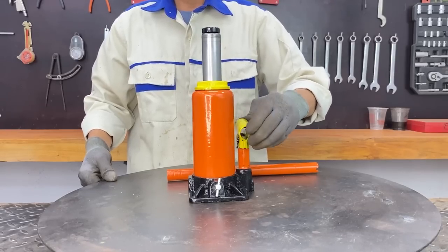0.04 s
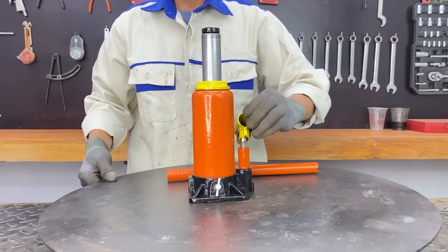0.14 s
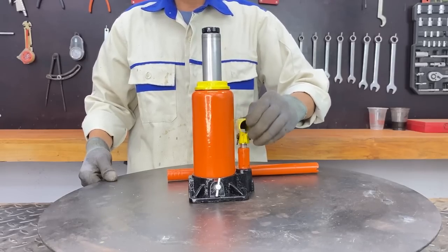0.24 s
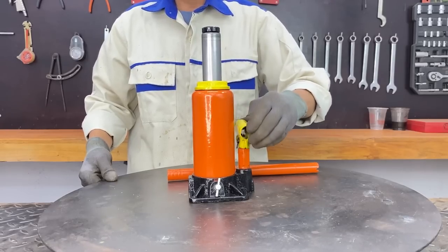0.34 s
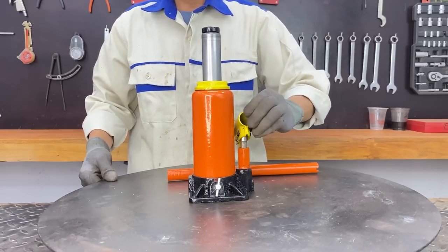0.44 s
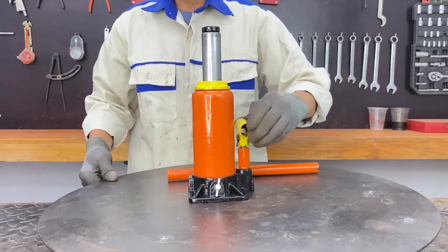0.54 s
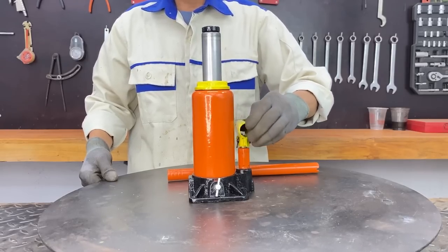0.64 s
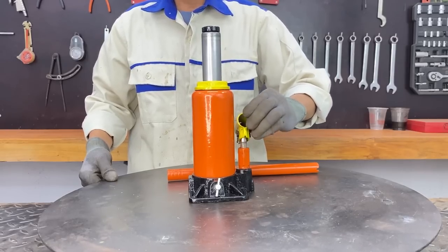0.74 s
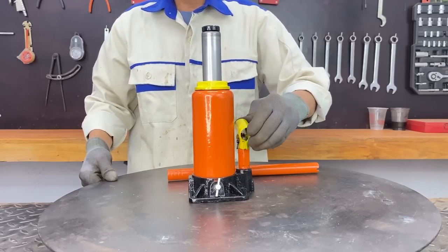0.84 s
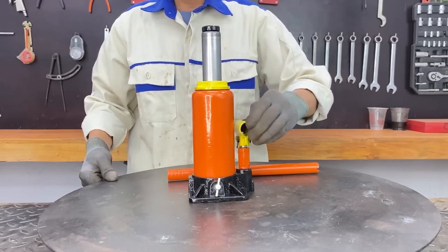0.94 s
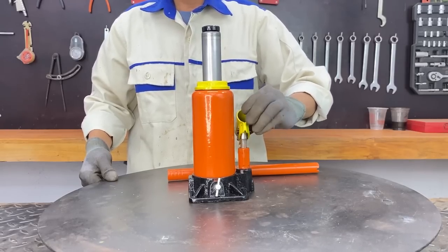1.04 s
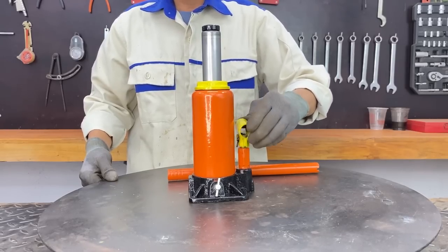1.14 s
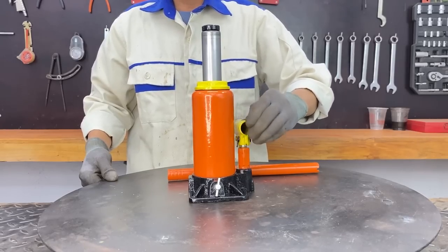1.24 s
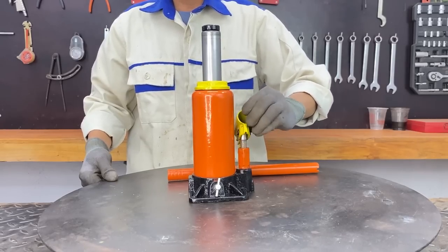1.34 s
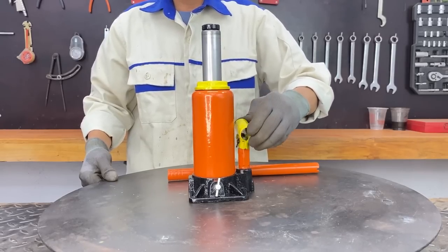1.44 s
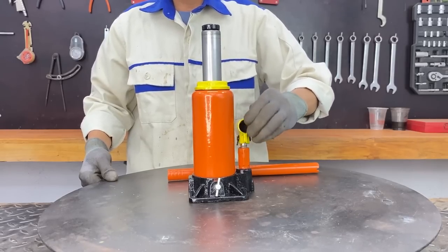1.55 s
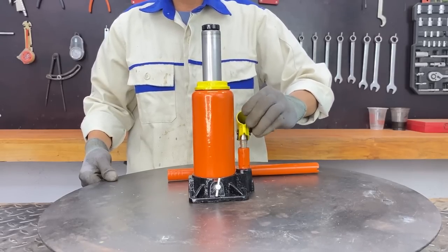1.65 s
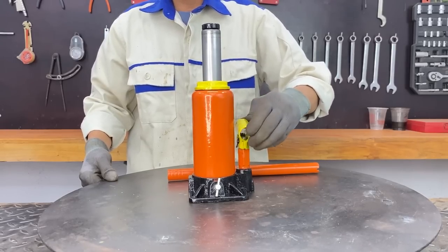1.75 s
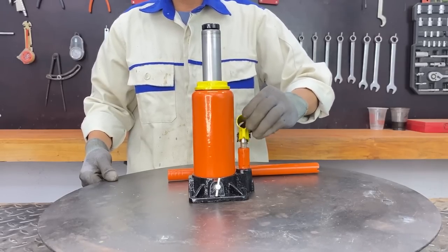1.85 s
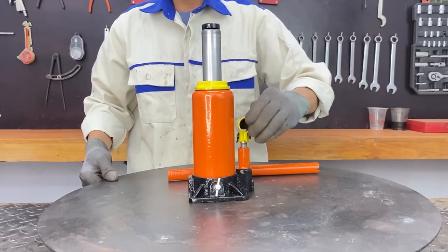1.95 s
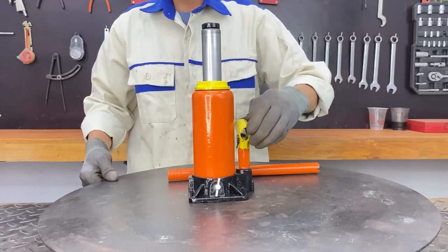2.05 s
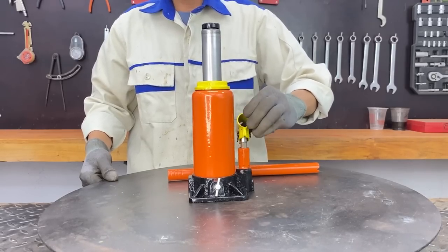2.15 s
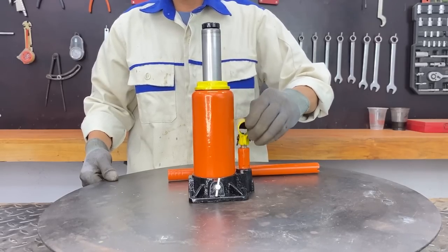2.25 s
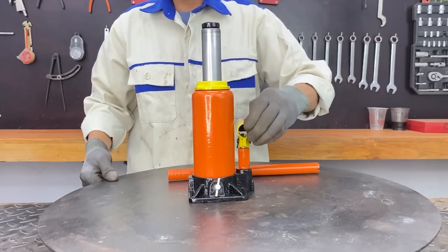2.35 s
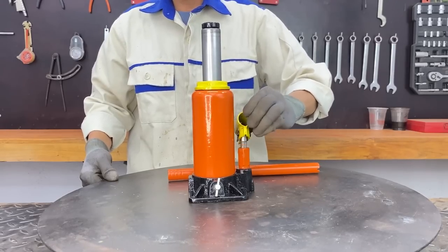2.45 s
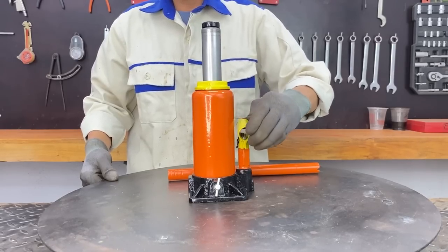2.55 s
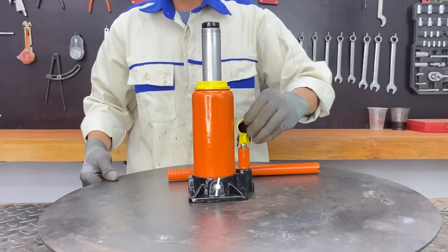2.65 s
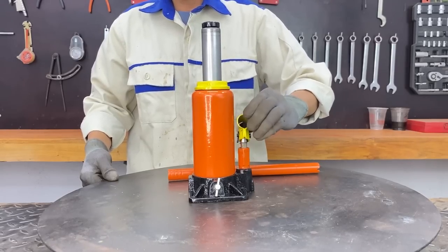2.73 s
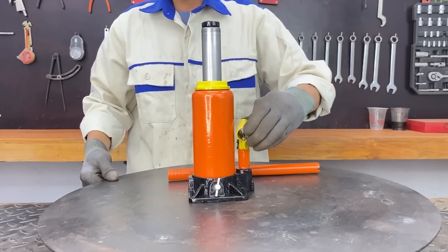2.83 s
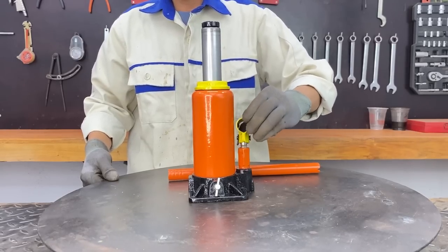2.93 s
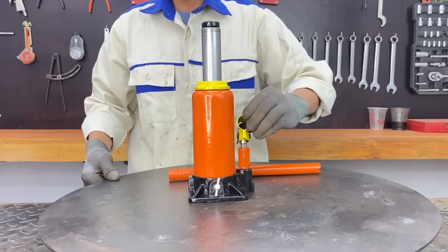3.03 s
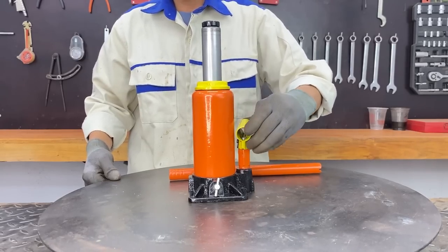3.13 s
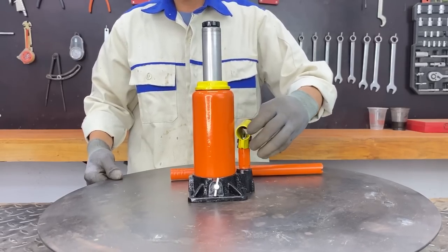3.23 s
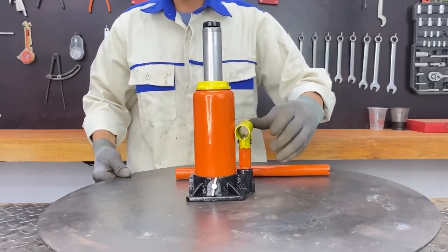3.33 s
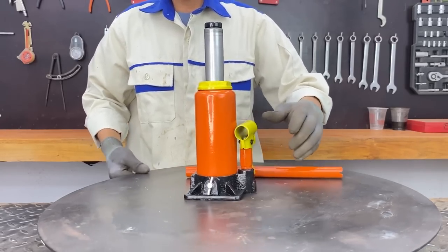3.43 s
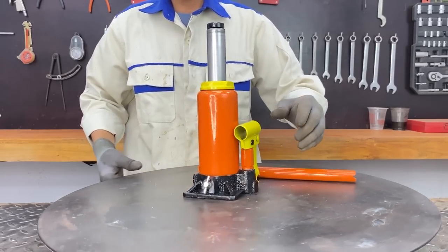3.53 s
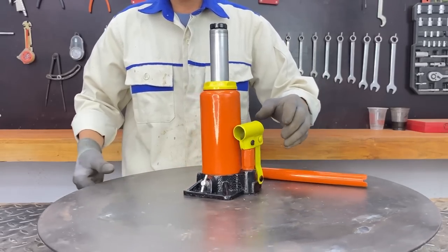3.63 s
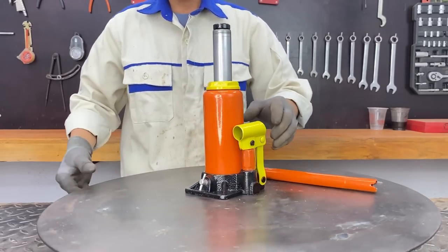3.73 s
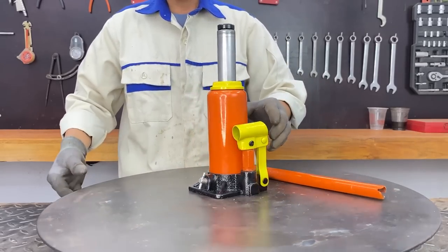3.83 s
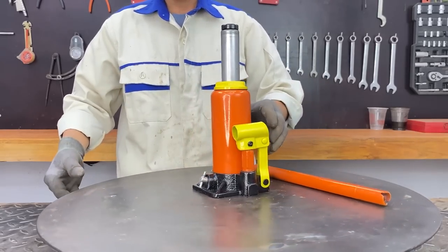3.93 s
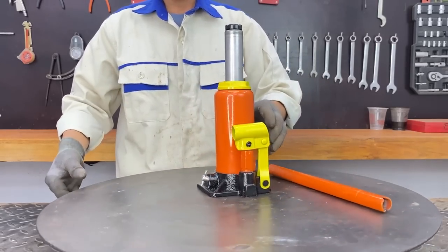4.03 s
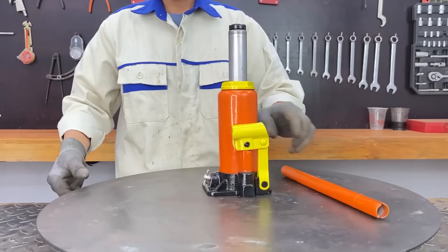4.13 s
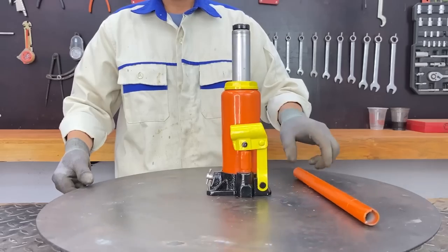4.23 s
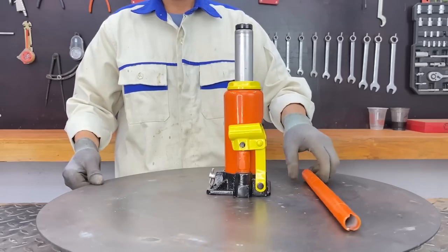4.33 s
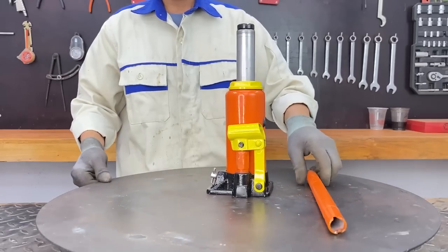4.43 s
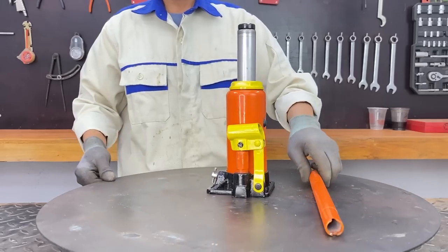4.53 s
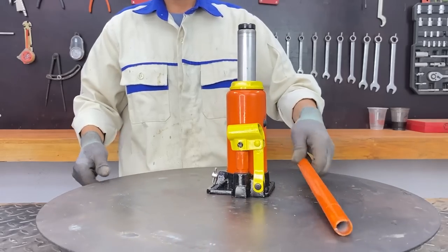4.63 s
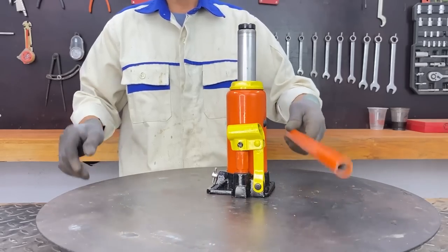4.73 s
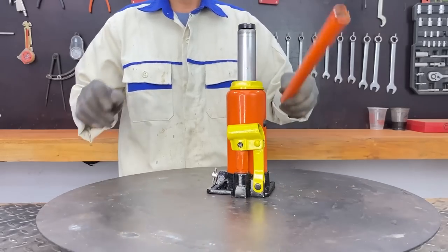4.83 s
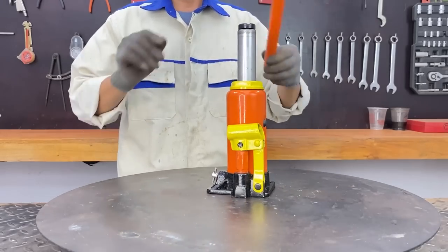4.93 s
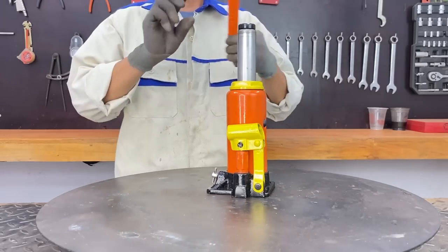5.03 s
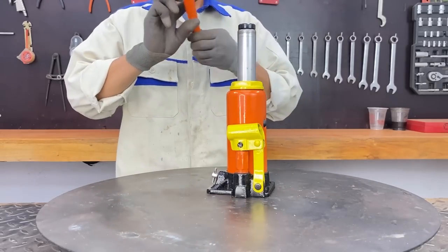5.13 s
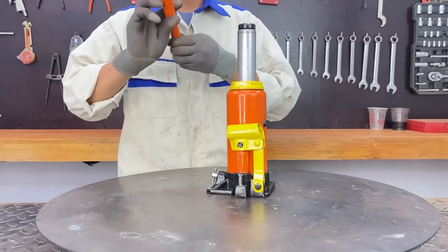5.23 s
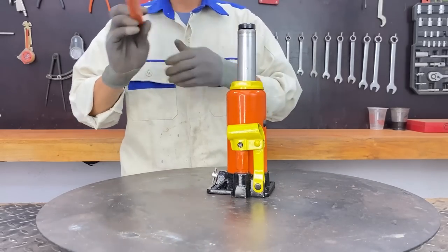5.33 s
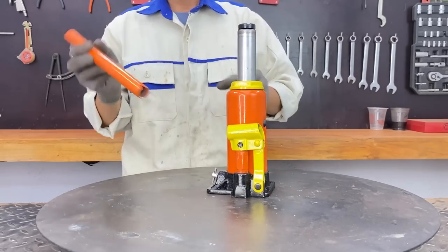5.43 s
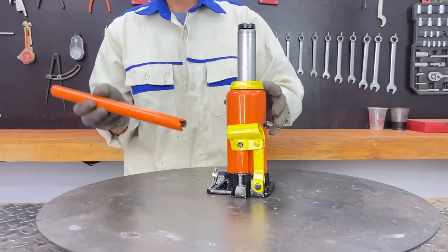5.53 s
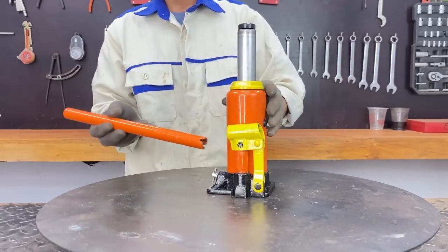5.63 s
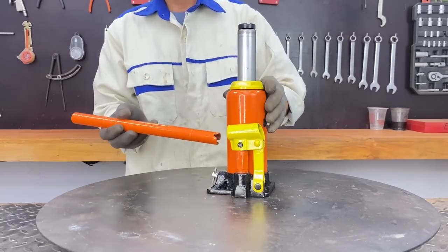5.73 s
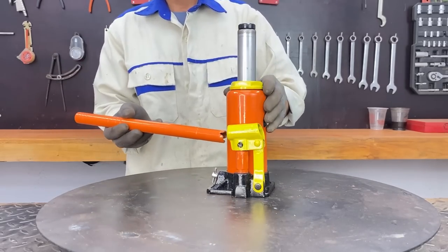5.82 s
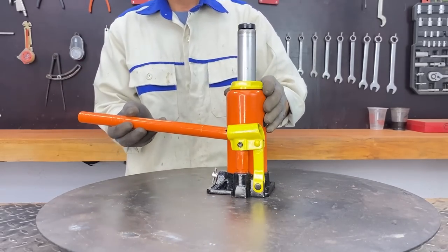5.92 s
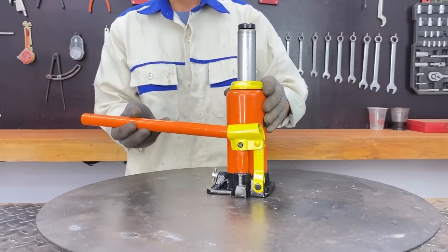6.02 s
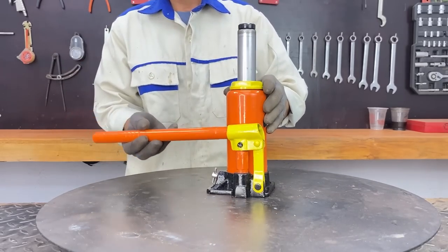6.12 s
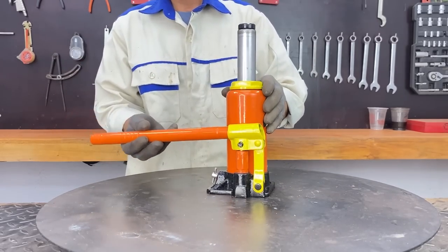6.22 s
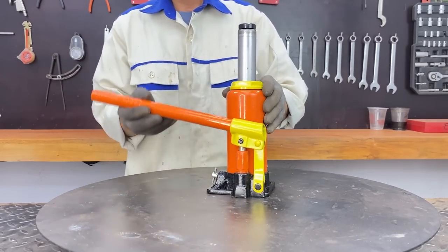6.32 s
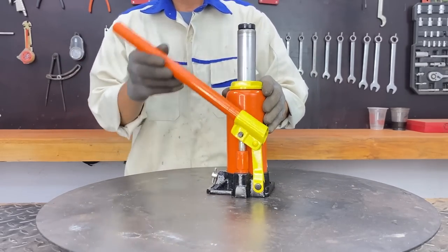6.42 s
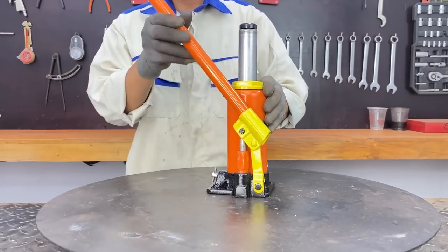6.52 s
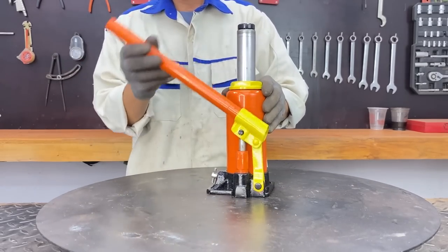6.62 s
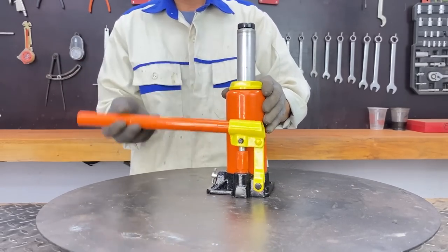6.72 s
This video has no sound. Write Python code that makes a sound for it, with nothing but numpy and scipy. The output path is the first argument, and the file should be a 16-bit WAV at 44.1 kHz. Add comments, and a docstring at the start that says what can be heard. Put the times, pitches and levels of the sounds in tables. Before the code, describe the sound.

Rapid hard metallic clacking from a hydraulic jack on a steel table stops, followed by quiet glove rustling and a few dull handle knocks.

```python
"""A seal groan, then hard steel clacks: a bottle jack on a round steel table, hand-pumped 3.5 strokes a second.
Each stroke: loose linkage chatters, lever clacks down, valve ticks, link clinks at the top; oily rubs and a low rumble lie under.
Then gloves and sleeves rustle as the jack is turned; the tube handle rolls aside, is picked up, fitted and worked.
Contacts are damped modes plus decaying noise grains; rubbing is coloured noise under envelopes; the seal is a wavering tone."""
import sys
import numpy as np
from scipy import signal
from scipy.fft import rfft, irfft, next_fast_len
from scipy.io import wavfile
from scipy.ndimage import uniform_filter1d, map_coordinates

SR = 44100
rng = np.random.default_rng(int(sys.argv[2]) if len(sys.argv) > 2 else 0)


def put_to_file(sound):
    """Save the sound as 16-bit audio at rate SR, in the file named by the first command-line argument."""
    columns = np.atleast_2d(sound).T  # one column per channel
    safe = np.clip(columns, -1, 1)
    whole_steps = np.round(safe * 32767)
    wavfile.write(sys.argv[1], SR, whole_steps.astype(np.int16))


N = 298557
AGE = np.arange(SR // 2) / SR  # s since a contact


def amp(db):
    """Decibels to gain."""
    return 10 ** (np.asarray(db) / 20)


def unit(x):
    """Scale to rms 1."""
    return x / np.sqrt(np.mean(x ** 2) + 1e-20)


def along(points, hz):
    """Interpolate (hz, value) points on a log frequency axis."""
    point_hz, value = np.transpose(points)
    return np.interp(np.log(hz + 1), np.log(point_hz + 1), value)


def filtered(x, response):
    """Multiply the spectrum of x by a response of frequency."""
    n = x.shape[-1]
    padded = next_fast_len(n + 8192)
    spectrum = rfft(x, padded) * response(np.fft.rfftfreq(padded, 1 / SR))
    return irfft(spectrum, padded)[..., :n]


def noise(spectrum, shape):
    """Coloured noise of rms 1."""
    return unit(filtered(rng.standard_normal(shape), lambda hz: amp(along(spectrum, hz))))


def wobble(knots_per_s):
    """Smooth random curve through evenly spaced knots."""
    knots = rng.standard_normal(int(N * knots_per_s / SR) + 4)
    return map_coordinates(knots, [np.arange(N) * knots_per_s / SR])


def uneven(spectrum, depth_db, knots_per_s):
    """Coloured rubbing noise whose level wanders, rms 1."""
    return unit(noise(spectrum, N) * amp(depth_db * wobble(knots_per_s)))


def fade(t60_s):
    """Exponential decay after a contact."""
    return np.exp(-np.log(1000) * AGE / t60_s)


def onset(attack_s):
    """Exponential rise after a contact."""
    return 1 - np.exp(-AGE / attack_s)


def swell(start_s, length_s, attack_s, release_s):
    """Movement envelope: smooth rise, hold to the end of length_s, decay of 60 dB per release_s."""
    t = np.arange(N) / SR - start_s
    rise = np.sin(np.pi / 2 * np.clip(t / attack_s, 0, 1)) ** 2
    return rise * np.exp(-np.log(1000) * np.clip((t - length_s) / release_s, 0, 2))


def ring(modes, attack_s):
    """Damped modes, gains normalised; random mode strengths and a slight random pitch blur roughen each ring."""
    hz, db, t60_s = np.transpose(modes)[:, :, None]
    gain = amp(db + 2 * rng.standard_normal(db.shape))
    drift = np.cumsum(rng.standard_normal((len(hz), len(AGE))), 1)
    blur_cycles = drift * np.sqrt(hz / SR) * .03
    cycles = hz * AGE + rng.random(hz.shape) + blur_cycles
    waves = np.sin(2 * np.pi * cycles) * fade(t60_s)
    return np.sum(gain * waves, 0) / np.linalg.norm(gain) * onset(attack_s)


def rattle(spectrum, t60_s, grit_db):
    """Dying cluster of tiny contacts, uneven by the millisecond, of equal energy at every call."""
    grit = unit(uniform_filter1d(rng.standard_normal(len(AGE)), size=48))
    cluster = noise(spectrum, len(AGE)) * amp(grit_db * np.clip(grit, -2, 2)) * fade(t60_s)
    return cluster * np.linalg.norm(fade(t60_s)) / np.linalg.norm(cluster)


def add(track, start_s, sound):
    """Mix a sound into the track."""
    start = max(round(start_s * SR), 0)
    track[start:start + len(sound)] += sound[:max(N - start, 0)]


# left-right likeness of diffuse sound: hz, likeness (-1 to 1)
LIKENESS = [(60, 0.97), (200, 0.94), (330, 0.66), (500, 0.66), (1100, -0.054), (2700, 0.017),
            (6400, -0.0014), (10500, 0.42), (13000, -0.75)]


def diffuse(pair):
    """Mix two unrelated signals into left and right, alike in the bass."""
    def weights(hz):
        angle = np.arccos(np.clip(along(LIKENESS, hz), -1, 1)) / 2
        return np.array([np.cos(angle), np.sin(angle)])
    mid, side = filtered(pair, weights)
    return np.array([mid + side, mid - side])


# low room rumble colour: hz, relative_db_per_hz
RUMBLE_COLOUR = [(20, -35.5), (35, -23), (50, -12), (68, 4.5), (90, -0.5), (120, -2), (170, -1),
                 (260, -4.5), (450, -13.5), (540, -9), (650, -20.5), (1280, -29.5), (2500, -50),
                 (5000, -100)]
# rumble level: time_s, level_db
RUMBLE_LEVEL = [(0.0, -57), (0.4, -58), (3.09, -61.5), (3.6, -65.5), (4.62, -64), (5.73, -67), (6.15, -66),
                (6.39, -64), (6.77, -60.5)]
# faint hiss colour: hz, relative_db_per_hz
HISS_COLOUR = [(350, -35.5), (600, 0), (944, -16), (1900, -10), (7940, -18.5), (10200, -36.5),
               (16000, -38.5)]


def background():
    """Diffuse low rumble, stronger while the jack is worked, under a faint steady hiss."""
    time_s, level_db = np.transpose(RUMBLE_LEVEL)
    rumble_db = np.interp(np.arange(N) / SR, time_s, level_db)
    rumble = amp(rumble_db) * diffuse(noise(RUMBLE_COLOUR, (2, N)))
    hiss = amp(-89.0) * diffuse(noise(HISS_COLOUR, (2, N)))
    return rumble + hiss


# workshop decay: hz, t60_s
ECHO_T60 = [(100, 0.55), (600, 0.65), (3000, 0.43), (7000, 0.39), (14000, 0.39)]


def echo():
    """One workshop answer to a click: noise decaying by band, the treble sooner."""
    hz, t, bands = signal.stft(rng.standard_normal((2, SR * 3 // 4)), SR, nperseg=256)
    decay = np.exp(-np.log(1000) * t / along(ECHO_T60, hz)[:, None])
    tail = signal.istft(bands * decay, SR, nperseg=256)[1]
    tail = tail * (1 - np.exp(-np.arange(tail.shape[1]) / SR / 0.0023))
    return tail / np.linalg.norm(tail[0])


# echo colour: hz, relative_level_db
ECHO_COLOUR = [(100, -16), (600, 3), (3000, -6.5), (7000, -2.5), (14000, -5.5)]


def room(x, count=14):
    """Echo of the foreground; each of count equal time spans draws a fresh random pattern."""
    out = np.zeros((2, N + SR))
    for part in np.array_split(np.arange(N), count):
        wet = signal.fftconvolve(x[None, part], echo(), axes=1)
        out[:, part[0]:part[0] + wet.shape[1]] += wet
    return filtered(diffuse(out[:, :N]), lambda hz: amp(along(ECHO_COLOUR, hz)))


# glove, sleeve and palm colours: hz, relative_db_per_hz
GLOVE_COLOUR = [(900, -23.5), (2200, -13.5), (4500, -5.5), (8000, -2.5), (11500, -7), (13500, -10.5),
                (15500, -11)]
SLEEVE_COLOUR = [(1500, -23), (3200, -4), (4400, 5), (5600, 4), (7000, -1), (8500, -26), (14000, -37)]
PALM_COLOUR = [(300, -13.5), (800, 2.5), (2000, -1), (3200, -0.5), (5000, -7), (10000, -24.5)]
# gloved hand takes hold of jack or handle: start_s, length_s, glove_db, palm_db
GRIPS = [(3.46, 0.04, -83.5, -91), (3.615, 0.051, -87, -78), (4.288, 0.063, -88, -80),
         (4.333, 0.041, -69.5, -98), (4.605, 0.079, -78.5, -83), (4.963, .13, -94.5, -82),
         (5.616, 0.075, -91, -77.5)]
GRIP_ATTACK_S, GRIP_RELEASE_S = 0.024, 0.13
# sleeve swishes as the arm moves: start_s, length_s, level_db
SWISHES = [(3.656, 0.14, -79), (4.32, .05, -80), (4.42, 0.18, -86), (4.6, 0.063, -77.5),
           (4.712, 0.097, -80), (4.83, 0.18, -92), (5.68, 0.096, -80)]
SWISH_ATTACK_S, SWISH_RELEASE_S = 0.038, 0.2
FIDGET_DB, FIDGET_SWING_DB = -99, 1.5  # faint rubbing of the overalls


def cloth():
    """Gloves catch in small uneven grains, palms rub lower, sleeves swish more softly."""
    glove = uneven(GLOVE_COLOUR, 2.2, 200)
    sleeve = uneven(SLEEVE_COLOUR, 1.1, 80)
    palm = uneven(PALM_COLOUR, 1.5, 110)
    out = amp(FIDGET_DB + FIDGET_SWING_DB * wobble(8.1)) * (palm + amp(-2) * glove)
    for start_s, length_s, glove_db, palm_db in GRIPS:
        grip = swell(start_s, length_s, GRIP_ATTACK_S, GRIP_RELEASE_S)
        out += grip * (amp(glove_db) * glove + amp(palm_db) * palm)
    for start_s, length_s, db in SWISHES:
        out += amp(db) * sleeve * swell(start_s, length_s, SWISH_ATTACK_S, SWISH_RELEASE_S)
    return out


# loose handle rolls on the table: start_s, length_s, level_db
ROLLS = [(3.447, 0.083, -80), (3.686, 0.11, -86), (4.4, .15, -90)]
# resonances of the rolling tube: centre_hz, width_hz, relative_db
ROLL_TONES = [(3810, 23, -9), (4340, 30, -9), (4870, 18, -5), (5260, 26, -7), (5510, 19, -5),
              (6500, 24, -9)]
ROLL_ATTACK_S, ROLL_RELEASE_S = 0.034, .4


def rolling():
    """Table grain, as white noise, excites the tube's narrow resonances."""
    def tube(hz):
        return sum(amp(db) * 1j * hz * width_hz / (centre_hz ** 2 - hz ** 2 + 1j * hz * width_hz)
                   for centre_hz, width_hz, db in ROLL_TONES)
    song = unit(filtered(rng.standard_normal(N), tube))
    level = sum(amp(db) * swell(start_s, length_s, ROLL_ATTACK_S, ROLL_RELEASE_S)
                for start_s, length_s, db in ROLLS)
    return song * level


# handle touches the socket and rings freely: time_s, relative_db
TINGS = [(5.9859, -56.5), (6.0368, -56)]
# handle knocks the jack's foot or inside the socket: time_s, knock_relative_db, thump_relative_db
KNOCKS = [(3.7753, -59, -65), (6.1666, -57, -62), (6.2082, -39, -54), (6.237, -51, -73), (6.2849, -52, -54),
          (6.3411, -57, -66), (6.4568, -69, -53.5), (6.5512, -66, -55), (6.6618, -58.5, -56),
          (6.6961, -41, -45.5)]
# handle moves in the socket: start_s, length_s, grate_db, piston_rub_db
MOVES = [(6.04, 0.16, -81.5, -87), (6.18, 0.18, -75.5, -73.5), (6.435, 0.13, -85, -70),
         (6.564, .09, -105, -80.5), (6.66, 0.076, -69, -66.5)]
MOVE_ATTACK_S, MOVE_RELEASE_S = 0.01, 0.18
# modes of the free tube, the seated tube and the table: hz, relative_db, t60_s
TUBE_MODES = [(2038, 9, 0.083), (2114, 2, .08), (2900, -5, 0.053), (5370, -7, .55), (5370, -10.5, 0.48),
              (9560, -19, 0.21), (12400, -15, 0.22)]
SOCKET_MODES = [(1690, 6.5, 0.022), (2275, 8, 0.033), (3160, -23, 0.036), (3860, -6, 0.043),
                (4200, -3, .06), (4780, 8, 0.051), (4930, 0, .05), (6070, -15, 0.15), (6860, -2, 0.054),
                (9700, -3, 0.045)]
TABLE_MODES = [(112.2, 0, 0.33), (194, -5.5, 0.2), (277.9, -7, .3), (322.2, -7.5, 0.28),
               (376.7, -8.5, 0.17), (432.3, -9, 0.14), (492.2, -8, 0.18), (560, -26, 0.1),
               (794.4, -7, 0.11), (856, -9.5, 0.14), (1074, -9, 0.068), (1146.4, -4.5, 0.074),
               (1238, -14.5, 0.21)]
# hard steel contact and oily piston rub colours: hz, relative_db_per_hz
CRACK_COLOUR = [(60, -8), (300, -15.5), (1400, -12.5), (2100, -12), (2900, 5), (3900, -3), (5400, -5.5),
                (7500, -15), (11500, -17), (16000, -22.5)]
OIL_COLOUR = [(250, -21), (450, 5), (650, -5.5), (1000, -4), (1500, -11.5), (3000, -20), (8000, -38)]


def handle():
    """The tube rings while free, then grates and knocks dully in the socket and draws the piston up."""
    grate = uneven(CRACK_COLOUR, 3.9, 250)
    rub = uneven(OIL_COLOUR, 2.4, 90)
    out = np.zeros(N)
    for start_s, length_s, grate_db, rub_db in MOVES:
        move = swell(start_s, length_s, MOVE_ATTACK_S, MOVE_RELEASE_S)
        out += move * (amp(grate_db) * grate + amp(rub_db) * rub)
    for time_s, db in TINGS:
        tube = amp(0.5) * ring(TUBE_MODES, attack_s=0.00016)
        touch = amp(-4.0) * rattle(CRACK_COLOUR, t60_s=0.01, grit_db=1.0)
        add(out, time_s, amp(db) * (tube + touch))
    for time_s, db, thump_db in KNOCKS:
        seated = amp(-6.0) * ring(SOCKET_MODES, attack_s=0.00066)
        scatter = amp(-8.0) * rattle(CRACK_COLOUR, t60_s=0.039, grit_db=-9)
        add(out, time_s, amp(db) * (seated + scatter))
        add(out, time_s, amp(thump_db + 2.5) * ring(TABLE_MODES[:6], attack_s=0.0031))
    return out


# pump strokes; valve shuts about 60 ms and link tops out about 130 ms after landing:
# landing_s, clack_relative_db, play_relative_db, valve_s, valve_relative_db,
# top_s, clink_relative_db, pin_relative_db
STROKES = [(0.0223, -26.5, -48, .083, -46.5, .1452, -28, -43.5),
           (0.2906, -25, -42.5, .355, -32.5, .4207, -30.5, -41),
           (0.5741, -24, -42.5, .6355, -26.5, .705, -25.5, -49.5),
           (0.86, -24.5, -44.5, .9085, -21, .9951, -27, -50),
           (1.1625, -24.5, -42.5, 1.2316, -24.5, 1.295, -27.5, -40.5),
           (1.447, -27, -43, 1.51, -24, 1.5821, -27, -45.5),
           (1.7354, -26, -43, 1.8034, -28.5, 1.8526, -28, -63),
           (1.997, -24.5, -39, 2.0595, -23, 2.1301, -29.5, -54.5),
           (2.2867, -23.5, -40.5, 2.3438, -24, 2.4086, -34.5, -56.5),
           (2.5562, -24, -44, 2.6174, -26.5, 2.6822, -31.5, -51),
           (2.8162, -24.5, -34.5, 2.8578, -23, 2.935, -36, -47),
           (3.1319, -23, -38, 3.1692, -27.5, 3.3285, -44, -61)]
PUSH_S, PUSH_DB, PUSH_RELEASE_S = .04, -63.5, .08  # starts PUSH_S before the landing


def piston():
    """Each downstroke pushes oil with a soft noise rub."""
    rub = uneven(OIL_COLOUR, 3.3, 90)
    pushes = sum(swell(landing_s - PUSH_S, PUSH_S, PUSH_S / 2, PUSH_RELEASE_S) for landing_s, *_ in STROKES)
    return amp(PUSH_DB) * rub * pushes


# seal slips and groans: start_s, length_s, pitch_hz, level_db
SLIPS = [(.006, 0.023, 618.3, -43.5), (0.028, .074, 652.5, -30.5), (0.112, .035, 597.3, -45.5),
         (.15, 0.073, 650.6, -48)]
SLIP_ATTACK_S, SLIP_RELEASE_S = .016, 0.029
# seal's rough edge: hz, relative_db_per_hz
RASP_COLOUR = [(300, -13), (900, 2.5), (1400, 1), (2200, -4), (4000, -9), (6000, -17), (12000, -30)]


def seal(overtone_db=-22, rasp_db=-22, rasp_growth=0.65):
    """Stick-slip: unsteady tone; overtones and a rasp on each cycle that lasts through the weak slips."""
    slips = np.array([amp(db) * swell(start_s, length_s, SLIP_ATTACK_S, SLIP_RELEASE_S)
                      for start_s, length_s, _, db in SLIPS]) + 1e-12
    force = slips.sum(0)
    pitch_hz = np.array(SLIPS)[:, 2] @ slips / force  # strongest slip dominates
    phase = 2 * np.pi * np.cumsum(pitch_hz * (1 + .025 * wobble(260))) / SR
    overtones = sum((1 + wobble(150)) * np.sin(k * phase) / k ** .5 for k in range(2, 7))
    rasp_level = force.max() * (force / force.max()) ** rasp_growth
    rasp = noise(RASP_COLOUR, N) * (1 + np.cos(phase)) * rasp_level
    level = force * amp(1.2 * wobble(110))
    groan = level * np.sin(phase)
    return groan, amp(overtone_db) * level * overtones + amp(rasp_db) * rasp


# modes of the link pin and the jack's body: hz, relative_db, t60_s
PIN_MODES = [(9130, -5.5, 0.012), (9260, -12.5, 0.047), (9260, -7.5, 0.053), (9454, -2.5, 0.038),
             (11740, -4, .015)]
JACK_MODES = [(1806, -9, 0.082), (2040, -14.5, .08), (2390, -8, 0.14), (2750, 1.5, .06),
              (2860, -12.5, 0.016), (2976, -4, .07), (3230, -11.5, 0.11), (3420, -2.5, .06),
              (3730, -7, .05), (4050, -11.5, 0.077), (4270, -9.5, 0.1), (4870, -15.5, .08),
              (5245, -4.5, 0.097), (5505, -6, 0.12), (6030, -9, .06), (7110, -16, .06)]
# loose steel chatter colour: hz, relative_db_per_hz
CHATTER_COLOUR = [(200, -21.5), (1500, -16), (3200, 2), (4300, -4.5), (5400, -5.5), (8000, -10.5),
                  (11800, -8), (16000, -5)]


def upstrokes(slide_s=.012):
    """The link scrapes up to its stop, where the small pin rings high."""
    out = np.zeros(N)
    for *_, top_s, db, pin_db in STROKES:
        scrape = np.minimum(AGE / slide_s, 1) * rattle(CHATTER_COLOUR, t60_s=.1, grit_db=4)
        add(out, top_s - slide_s, amp(db - 10) * scrape)
        stop = amp(-2) * rattle(CHATTER_COLOUR, t60_s=.014, grit_db=2.5) * onset(0.00074)
        body = amp(-14) * ring(JACK_MODES, attack_s=0.00089)
        table = amp(-19.0) * ring(TABLE_MODES, attack_s=.004)
        add(out, top_s, amp(db) * (stop + body + table))
        add(out, top_s, amp(pin_db + 8.5) * ring(PIN_MODES, attack_s=.0006))
    return out


# modes of the valve: hz, relative_db, t60_s
VALVE_MODES = [(2628, -3.5, 0.0044), (3260, 1, .007), (6520, -23.5, 0.017), (7180, -24, 0.03),
               (7380, -28, 0.0088)]


def valve():
    """Hard, quickly damped tick that also stirs the body and the table."""
    out = np.zeros(N)
    for _, _, _, valve_s, db, *_ in STROKES:
        snap = amp(8) * ring(VALVE_MODES, attack_s=0.00065)
        body = amp(-20) * ring(JACK_MODES, attack_s=0.0022)
        table = amp(-21.5) * ring(TABLE_MODES, attack_s=.003)
        scatter = amp(-19.5) * rattle(CRACK_COLOUR, t60_s=0.049, grit_db=2.5)
        add(out, valve_s, amp(db) * (snap + body + table + scatter))
    return out


# modes of the lever's pivot: hz, relative_db, t60_s
PIVOT_MODES = [(9250, -9, .02), (11550, -1.5, 0.036), (11930, -2.5, .07), (11600, 0, .05), (15400, -6, .02)]
# dull part of a blow on the table: hz, relative_db_per_hz
THUD_COLOUR = [(25, -48.5), (50, -22), (100, 2.5), (330, 2.5), (650, -14.5), (1100, -7), (1500, -11),
               (3000, -35.5)]
PLAY_S = .016  # linkage takes up its play before landing
THUMP_DB, JOLT_DB = -17, 0.5  # table thump and valve jolt gains within the clack


def downstrokes():
    """The loose pivot ticks and chatters, then the lever lands: crack, body ring, valve jolt, table thump."""
    out = np.zeros(N)
    for landing_s, db, play_db, *_ in STROKES:
        tick = amp(-6.5) * rattle(CHATTER_COLOUR, t60_s=0.0066, grit_db=2.5)
        tick = tick + amp(-5) * ring(PIVOT_MODES, attack_s=.0002)
        chatter = amp(-8) * rattle(CHATTER_COLOUR, t60_s=.3, grit_db=-0.5) * (AGE < PLAY_S)
        add(out, landing_s - PLAY_S, amp(play_db) * (tick + chatter))
        crack = amp(-5.0) * rattle(CRACK_COLOUR, t60_s=0.048, grit_db=2.5) * onset(0.0039)
        body = amp(-10) * ring(JACK_MODES, attack_s=.0007)
        spark = amp(-3.5) * rattle(CHATTER_COLOUR, t60_s=0.0042, grit_db=8.0)
        jolt = amp(JOLT_DB) * ring(VALVE_MODES, attack_s=.0012)
        thud = amp(-9.5) * rattle(THUD_COLOUR, t60_s=0.22, grit_db=6.0) * onset(0.0037)
        thump = amp(THUMP_DB) * (ring(TABLE_MODES, attack_s=0.0023) + thud)
        add(out, landing_s, amp(db) * (crack + body + spark + jolt + thump))
    return out


# phase by which the left port leads the right: hz, lead_rad
PORT_LEAD = [(20, 0), (700, 0), (1200, .8), (2000, .2), (4800, .6), (11000, .6), (13000, 2.8), (16000, 2)]
GROAN_ECHO_DB = -16  # groan's share of the room's answer


def scene(low_hz=70):
    """Jack, handle and hands before a close pair of microphone ports, with room echo and background."""
    groan, rasp = seal()
    work = cloth() + rolling() + handle() + piston() + rasp + upstrokes() + valve() + downstrokes()
    # gentle bass cut below low_hz keeps the contacts lean
    work = filtered(work, lambda hz: (1j * hz / (low_hz + 1j * hz)) ** 2)
    direct = filtered(work + groan, lambda hz: np.exp(np.array([[.5j], [-.5j]]) * along(PORT_LEAD, hz)))
    echoes = room(work + amp(GROAN_ECHO_DB) * groan)
    return direct + amp(-0.5) * echoes + background()


# port sensitivity: hz, left_minus_right_db
PORT_TILT = [(60, 0.5), (110, 0.0), (200, -0.5), (380, 1), (700, 1), (1290, 2), (2380, 1.5), (4400, 1.5),
             (8120, 4), (15000, -1.5)]
TOP_HZ = 16000


def record(dry):
    """Left and right ports differ in sensitivity by frequency; a steep low-pass sets the band limit."""
    def response(hz):
        sides = amp(np.array([[.5], [-.5]]) * along(PORT_TILT, hz))
        return sides / (1 + (hz / TOP_HZ) ** 120)
    return filtered(dry, response)


dry = scene()
out = record(dry)
put_to_file(out)
```